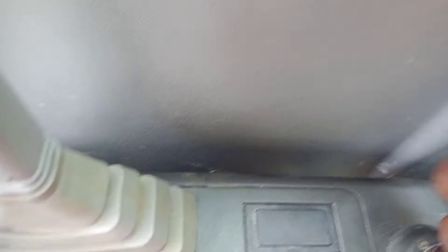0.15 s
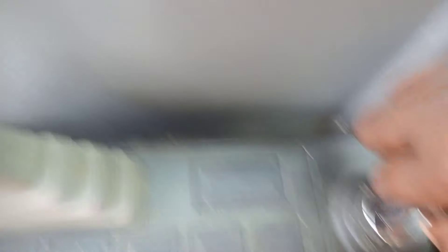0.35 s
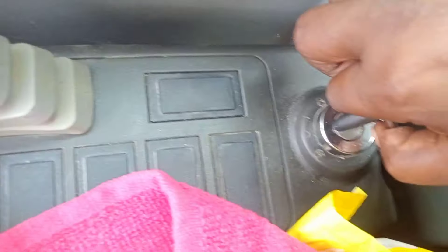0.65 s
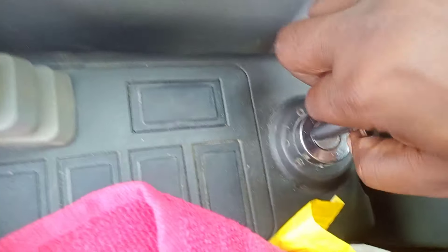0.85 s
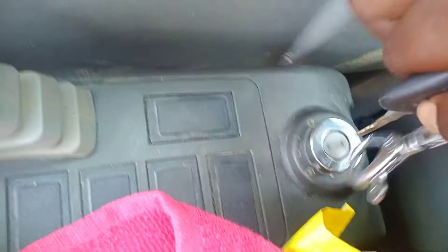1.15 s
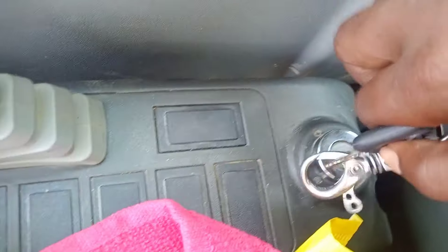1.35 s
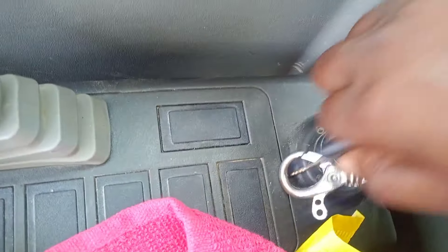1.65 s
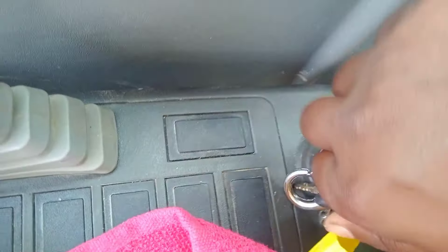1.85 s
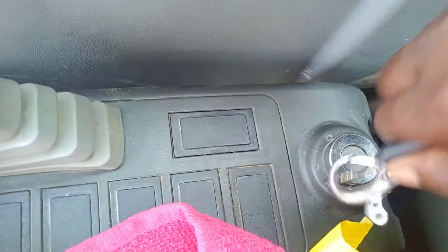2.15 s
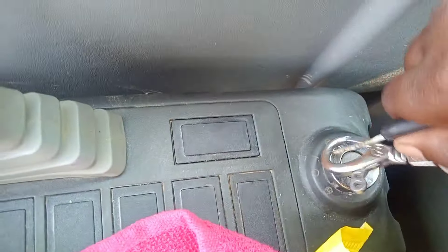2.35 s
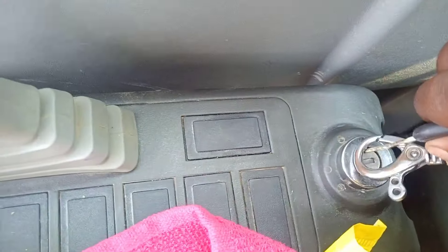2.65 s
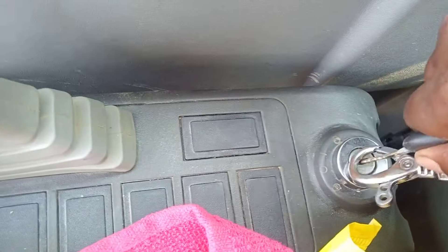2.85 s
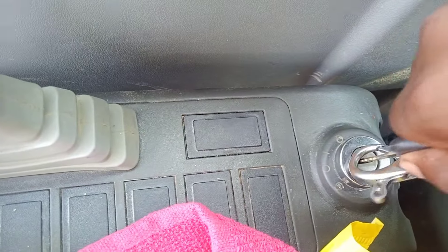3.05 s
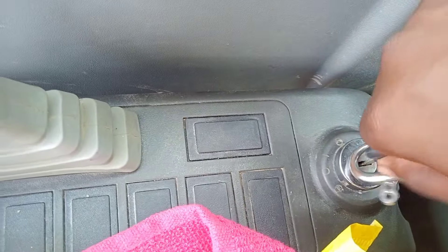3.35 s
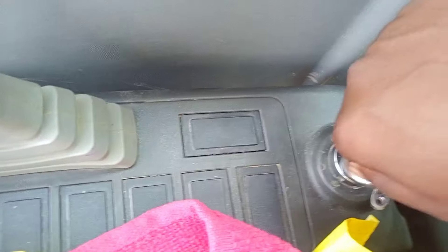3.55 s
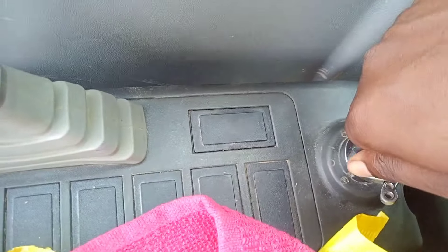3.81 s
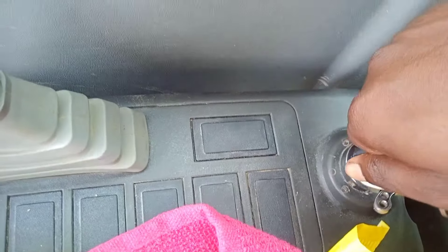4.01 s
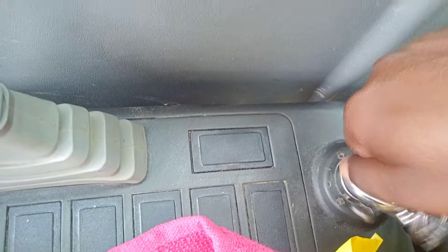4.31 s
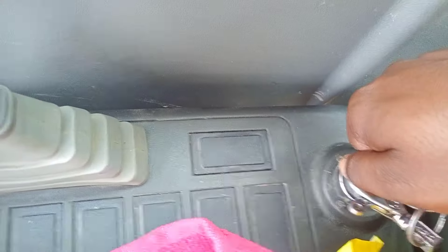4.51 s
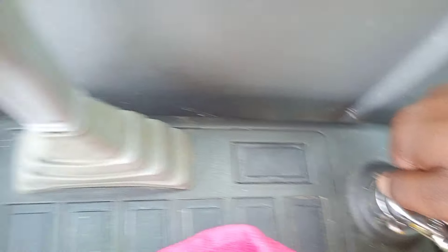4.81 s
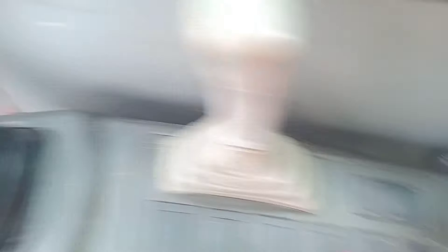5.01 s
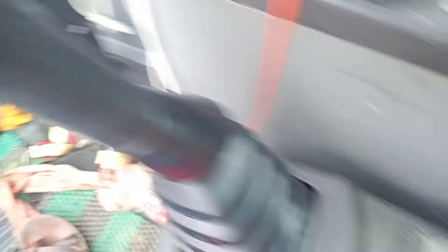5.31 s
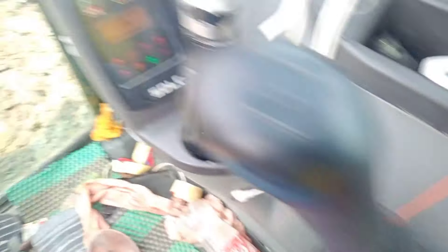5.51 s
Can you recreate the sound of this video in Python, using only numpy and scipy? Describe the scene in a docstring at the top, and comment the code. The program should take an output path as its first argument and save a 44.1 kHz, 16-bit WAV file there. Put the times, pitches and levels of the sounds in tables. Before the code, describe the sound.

Centred close-up of key handling in a small, short-echoed cab. Hard pops from fingers on the camera come first, then irregular metal clacks with hollow plastic thuds and gritty scrapes as the key finds its slot. The handling thins out and nearly stops before a crisp ignition snap with a short springy ring. After a pause a quiet, grainy motor hum starts and holds. Very faint rumble and a few thin chirps lie behind.

```python
"""A bunch of keys clatters on an ignition lock in a hollow plastic console, inside a small excavator cab.
The key scrapes in and snaps the switch over; some 0.8 s later an electric motor begins to whirr.
Fingers bump and rub the camera, mostly in the first second; faint chirps, ticks and a rumble lie behind.
Blows are damped modes and short noise bursts, slides are grainy noise driving the same modes,
bumps are falling chirps, and the motor and the rumble are coloured noise."""
import sys
import numpy as np
from scipy import signal
from scipy.fft import rfft, irfft, next_fast_len
from scipy.io import wavfile
from scipy.ndimage import uniform_filter1d, map_coordinates

SR = 44100
rng = np.random.default_rng(int(sys.argv[2]) if len(sys.argv) > 2 else 0)


def int16_out(signal):
    """Quantize to a 16-bit WAV file."""
    q = np.round(np.clip(np.atleast_2d(signal).T, -1, 1) * 32767)
    wavfile.write(sys.argv[1], SR, q.astype(np.int16))


N = 250104
T = np.arange(SR // 2) / SR  # time since a blow, s


def amp(db):
    """Level: decibels to a linear gain."""
    return 10 ** (np.asarray(db) / 20)


def unit(x):
    """Normalisation: scale to rms 1."""
    return x / np.sqrt(np.mean(x ** 2) + 1e-20)


def struck(x):
    """Normalisation of a transient: rms 1 over its first 20 ms."""
    return x / np.sqrt(np.mean(x[:SR // 50] ** 2) + 1e-20)


def along(points, hz):
    """Interpolation of (Hz, value) points on a log-frequency axis."""
    point_hz, values = np.transpose(points)
    return np.interp(np.log(hz + 1), np.log(point_hz + 1), values)


def hump(hz, centre_hz, octaves):
    """Resonance curve: a bell of height 1 on a log-frequency axis."""
    return np.exp(-(np.log2((hz + 1) / centre_hz) / octaves) ** 2)


def filtered(x, response):
    """Linear filtering: the spectrum of x times a response of frequency."""
    n = x.shape[-1]
    m = next_fast_len(n + 4096)
    return irfft(rfft(x, m) * response(np.fft.rfftfreq(m, 1 / SR)), m)[..., :n]


def noise(spectrum, size):
    """Coloured noise: white noise shaped by (Hz, dB) points, rms 1."""
    return unit(filtered(rng.standard_normal(size), lambda hz: amp(along(spectrum, hz))))


def wobble(rate):
    """Random modulation: a smooth curve through rate random knots a second."""
    knots = rng.standard_normal(int(N * rate / SR) + 4)
    return map_coordinates(knots, [np.arange(N) * rate / SR])


def fade(t60):
    """Damping: exponential decay by 60 dB in t60 seconds."""
    return np.exp(-np.log(1000) * T / max(t60, 1e-4))


def onset(rise):
    """Finite contact time: an exponential swell with time constant rise in seconds."""
    return 1 - np.exp(-T / max(rise, 1e-5))


def ring(modes, scatter_db, detune):
    """Modal superposition: damped sines; each blow lands elsewhere and excites them differently."""
    total = np.zeros(len(T))
    for hz, db, t60 in modes:
        level, shift, phase = rng.standard_normal(3)
        sine = np.sin(2 * np.pi * (hz * (1 + detune * shift) * T + phase))
        total += amp(db + scatter_db * level) * fade(t60) * sine
    return struck(total)


def add(track, s, sound):
    """Superposition: mix a sound into the track at s seconds."""
    part = track[max(round(s * SR), 0):][:len(sound)]
    part += sound[:len(part)]


def stroke(start, length, db, attack, release):
    """Force envelope: swell, hold and fade; attack and release are the times for 20 dB."""
    t = np.arange(N) / SR
    outside = np.maximum((start - t) / attack, (t - start - length) / release)
    return amp(db) * 10 ** -np.maximum(outside, 0)


# Spectrum of the faint outdoor rumble. Each row: frequency in Hz, level in dB.
RUMBLE_SPECTRUM = [(20, -37), (38, -5.5), (58, 8.5), (110, -7), (250, -8), (600, -14), (1000, -18),
                   (1600, -22.5), (2800, -21.5), (3800, -28.5), (5000, -39), (6300, -48), (9500, -43),
                   (15500, -51.5)]
RUMBLE_DB = -59


def rumble():
    """Broadband background noise whose level drifts slowly."""
    return amp(RUMBLE_DB + 0.85 * wobble(3.6)) * noise(RUMBLE_SPECTRUM, N)


# Thin, far-off calls. Each row: start in seconds, end in seconds, top pitch in Hz, level in dB.
CHIRPS = [(1.8, 1.89, 3600, -69), (3.28, 3.351, 3700, -71), (3.952, 4.08, 3540, -73.5)]


def bird(arch=.09):
    """Frequency modulation: faint whistles from outside whose pitch follows an arch."""
    out = np.zeros(N)
    for start, end, top_hz, db in CHIRPS:
        u = np.linspace(0, 1, max(round((end - start) * SR), 2))
        pitch = top_hz * (1 - arch * (2 * u - .9) ** 2)
        tone = np.sin(2 * np.pi * np.cumsum(pitch) / SR)
        add(out, start, amp(db) * np.sin(np.pi * u) * tone)
    return out * amp(2.75 * wobble(180))  # echoes on the way make them flutter


# Small loose things ticking in the cab. Each row: time in seconds, strength in dB.
TICKS = [(1.934, -31.5), (4.694, -39.5), (5.473, -42.5), (5.551, -42), (5.574, -39)]
# Spectrum of skin on a casing, which also colours the loose ticks. Each row: frequency in Hz, level in dB.
SKIN_SPECTRUM = [(40, -22.5), (100, -2.5), (250, 4.5), (600, -1), (1200, -6), (2000, -5.5), (3300, -15.5),
                 (4500, -20.5), (6200, -35.5), (9500, -31.5), (15500, -37.5)]


def ticks():
    """Impulsive excitation: light, dry ticks of loose parts as decaying noise."""
    out = np.zeros(N)
    for s, db in TICKS:
        add(out, s, amp(db - 5.5) * noise(SKIN_SPECTRUM, len(T)) * fade(0.024))
    return out


# Spectrum of the motor's rush. Each row: frequency in Hz, level in dB.
WHIRR_SPECTRUM = [(71, -49.5), (120, -7), (221, -9.5), (276, 0.5), (353, -18), (390, -5.5), (764, -1),
                  (1080, -17.5), (1300, -5), (1490, -16), (2340, -12.5), (3810, -18.5), (6210, -43),
                  (9510, -41), (15500, -47)]
MOTOR_START_S, SPIN_UP_S, MOTOR_DB = 5.276, 0.066, -51  # switch-on, time constant, rush at full speed


def motor(whine_hz=765, whine_db=-4):
    """First-order run-up: a grainy rush grows with speed, a fuzzy steady-pitched whine with its square."""
    since_start = np.maximum(np.arange(N) / SR - MOTOR_START_S, 0)
    speed = 1 - np.exp(-since_start / SPIN_UP_S)
    resonance = lambda hz: 1 / (1 + ((hz - whine_hz) / 35) ** 2)
    whine = unit(filtered(rng.standard_normal(N), resonance))
    rush = noise(WHIRR_SPECTRUM, N) * unit(amp(2.48 * wobble(160)))
    return amp(MOTOR_DB) * speed * (rush + amp(whine_db) * speed * whine)


# Fingers on the camera body. Each row: time in seconds, strength in dB, starting pitch in Hz,
# time for the pitch to halve in seconds, t60 in seconds.
BUMPS = [(.39, -10, 4340, 0.0022, 0.011), (0.3959, -15, 3920, .0011, 0.015),
         (.4304, -4.5, 3720, 0.00044, 0.021), (0.456, -29, 400, 0.003, .08),
         (0.5691, -17, 4020, .00059, 0.022), (.5769, -4.5, 3264, .00055, .021),
         (.64, -24, 1010, 0.0014, .029), (0.8719, -14, 1780, 0.00094, 0.019)]
# Skin rubbing the camera. Each row: start in seconds, length in seconds, level in dB,
# attack and release in seconds per 20 dB.
RUBS = [(.487, 0.017, -33, 0.025, 0.135), (0.791, 0.05, -36.5, 0.12, 0.052),
        (5.513, 0.013, -47, 0.023, 0.023)]
EDGE_DB, EDGE_GROWTH = 5.5, 3.1  # sharp edge re the shell of a 0 dB bump; dB gained on it per dB of strength


def handling():
    """Dispersion and stick-slip: fingers bump and rub the camera, close and without any echo."""
    pressure = sum(stroke(*rub) for rub in RUBS)
    stick_slip = unit(amp(0.9 * wobble(60) + 2.8 * wobble(700)))
    out = pressure * noise(SKIN_SPECTRUM, N) * stick_slip
    for s, db, pitch_hz, sag, t60 in BUMPS:
        # bending waves in the casing: the treble arrives first, the bass trails
        cycles = pitch_hz * sag * np.log1p(T / sag)
        shell = np.sin(2 * np.pi * cycles) * fade(t60) * onset(0.00072)
        edge = np.sin(2 * np.pi * 8600 * T) + np.sin(2 * np.pi * 3300 * T)
        edge = (edge + 0.11 * rng.standard_normal(len(T))) * fade(.003) * onset(.0001)
        scatter = 0.21 * noise(SKIN_SPECTRUM, len(T)) * fade(t60)
        add(out, s, amp(db) * (shell + scatter + amp(EDGE_DB + EDGE_GROWTH * db) * edge))
        add(out, s + 0.0015, 0.05 * amp(db) * shell)  # the wave returns from the casing's edge
    return out


# Firm grips on the key, which lower the console's thud. Each row: start in seconds, end in seconds,
# thud pitch in Hz.
GRIPS = [(1.09, 1.24, 187), (3.2, 3.66, 159), (4.42, 4.45, 205)]
LOOSE_THUD_HZ = 294


def gripped(s):
    """Boundary condition: 1 while the key is gripped firmly, else 0."""
    return sum((s >= start) & (s < end) for start, end, _ in GRIPS)


def thud_pitch(s):
    """Boundary condition: the pitch that the console favours at time s."""
    return next((hz for start, end, hz in GRIPS if start <= s < end), LOOSE_THUD_HZ)


# Modes of the hollow console. Each row: frequency in Hz, level in dB, t60 in seconds.
CONSOLE = [(76.9, -20.5, 0.37), (147.3, -4.5, 0.23), (190, -4.5, 0.16), (251, -5, 0.13), (284.9, 0, .14),
           (334.8, -4.5, 0.12), (422.7, -4, 0.1), (500, -4, 0.12), (575, -3, 0.038)]


def thud(pitch_hz, lift_db, octaves):
    """Selective modal excitation: the direction of the push favours console modes near one pitch."""
    modes = [(hz, db + lift_db * hump(hz, pitch_hz, octaves), t60) for hz, db, t60 in CONSOLE]
    return ring(modes, scatter_db=2.5, detune=.03) * onset(0.0038)


# Metal sliding on metal. Each row: start in seconds, length in seconds, force in dB,
# console shudder in dB relative to the force.
SLIDES = [(0.053, .025, -35.5, -6.5), (.315, .05, -50, 4.5), (1.037, .13, -40.5, 3.5),
          (1.413, 0.047, -39.5, 5.5), (1.501, 0.13, -54, 0), (1.679, .11, -39, 0),
          (2.003, .135, -28.5, -5.5), (2.185, .045, -41.5, -6), (2.276, 0.096, -48, 8.5),
          (2.435, 0.21, -58, 4), (2.875, .035, -39, 6), (3.102, 0.18, -54, 11.5), (3.483, .15, -37, 4),
          (3.681, .13, -65.5, 5)]
CATCHES_PER_S, CATCH_DB = 20, 6  # teeth that snag during a slide; their mean strength re its force


def catches(pitch_hz=2200, spread=.3, scatter_db=3, thud_db=-8, tick_db=-19):
    """Random impacts: light contacts within each slide, as rows like those of CONTACTS."""
    rows = []
    for start, length, db, _ in SLIDES:
        for when, force, place in rng.uniform(-1, 1, (8, 3))[:round(CATCHES_PER_S * length)]:
            s = start + length * (when + 1) / 2
            strength_db = db + CATCH_DB + scatter_db * force
            rows.append((s, strength_db, pitch_hz * np.exp(spread * place), thud_db, tick_db))
    return rows


def rubbed(modes):
    """Convolution: continuous friction noise drives a set of modes, rms 1."""
    response = ring(modes, scatter_db=0.5, detune=0.013) * onset(0.00086)
    return unit(signal.fftconvolve(rng.standard_normal(N), response)[:N])


# Spectrum of the scrape. Each row: frequency in Hz, level in dB.
SCRAPE_SPECTRUM = [(100, -29), (300, -4), (550, -7), (820, 8.5), (1100, -5), (1900, 1.5), (2500, -3.5),
                   (3200, -8), (4000, -15.5), (5500, -31.5), (9000, -49)]
# Spectrum of the bright metal tick. Each row: frequency in Hz, level in dB.
TICK_SPECTRUM = [(2500, -32), (4500, 3.5), (6500, -5), (9000, 1.5), (12500, -6), (15000, -2.5)]
# Modes of the lock barrel. Each row: frequency in Hz, level in dB, t60 in seconds.
BARREL = [(1691, 2, 0.04), (1875, -13, 0.13), (2296, -9, 0.059), (3116, -12, .06)]
SLIDE_ATTACK_S, SLIDE_RELEASE_S, SHUDDER_RELEASE_S = 0.017, 0.045, 0.1  # time to change by 20 dB


def slides(barrel_db=-10, tick_db=-23, grain_db=2.5):
    """Stick-slip: the key's teeth catch and slip, a grainy scrape that rings barrel and console."""
    force, shudder = np.zeros(N), np.zeros(N)
    for s, length, db, shudder_db in SLIDES:
        force += stroke(s, length, db, SLIDE_ATTACK_S, SLIDE_RELEASE_S)
        shudder += stroke(s, length, db + shudder_db, SLIDE_ATTACK_S, SHUDDER_RELEASE_S)
    grip = force * unit(amp(grain_db * wobble(450)))
    steel = noise(SCRAPE_SPECTRUM, N) + amp(tick_db) * noise(TICK_SPECTRUM, N)
    # a firm grip strengthens the console's second and third modes
    firm = uniform_filter1d(1.0 * gripped(np.arange(N) / SR), size=900)
    console = amp(-2.5) * rubbed(CONSOLE[3:]) + (0.39 + .45 * firm) * rubbed(CONSOLE[1:3])
    return amp(-3.0) * grip * steel + amp(barrel_db) * force * rubbed(BARREL) + shudder * console


# Spectrum of the key's clack. Each row: frequency in Hz, level in dB.
CLACK_SPECTRUM = [(100, -29.5), (300, -5.5), (500, -10), (800, 3), (1150, -4.5), (1800, 0.5), (2500, -1),
                  (3200, 0), (4000, -10.5), (5500, -31.5), (9000, -40)]


def clack(pitch_hz, lift_db, octaves, t60):
    """High modal density: the short ring of a key as noise in which one region stands out."""
    colour = lambda hz: amp(along(CLACK_SPECTRUM, hz) + lift_db * hump(hz, pitch_hz, octaves))
    dense = filtered(rng.standard_normal(len(T)), colour)
    return struck(dense * (fade(t60) + 0.093 * fade(0.011)) * onset(0.0004))


def chatter(rate, depth_db):
    """Repeated impact: tiny rebounds make the strength of a contact flutter while it dies."""
    knots = np.arange(0, 1, 1 / rate)
    flutter = np.clip(rng.standard_normal(len(knots)), -2, 2)
    return amp(depth_db * np.interp(T, knots, flutter))


# Key against lock, from faint touches to hard blows. Each row: time in seconds, strength in dB,
# clack pitch in Hz, console thud and bright tick in dB relative to the strength
# (each layer then has its own fixed trim).
CONTACTS = [(.0014, -20.5, 2040, -17, -36.5), (0.0574, -12.5, 2090, -22.5, -39.5),
            (0.7998, -22.5, 1758, -29, -37.5), (1.034, -32, 1140, 5, -39.5), (1.0833, -20, 1910, 0, -31.5),
            (1.0952, -13.5, 2440, -6.5, -24), (1.1153, -16, 2000, -6.5, -19.5),
            (1.1407, -9, 1782, -13, -28.5), (1.1698, -23, 3100, -6.5, -39),
            (1.333, -9.5, 3150, -11.5, -22.5), (1.3511, -19, 3170, -5, -24.5),
            (1.4062, -4.5, 1840, -16.5, -28.5), (1.4115, -11, 1692, -16, -29.5),
            (1.4578, -12, 3380, -17, -25.5), (1.7394, -4, 1623, -12.5, -44),
            (1.7687, -19.5, 1450, -2.5, -27), (1.7836, -26.5, 1270, -11, -22),
            (1.8895, -33.5, 1134, -12.5, -38.5), (2.001, -14.5, 2290, -17, -30.5),
            (2.066, -16.5, 1736, -7.5, -25), (2.0889, -17.5, 1739, -11.5, -27.5),
            (2.1839, -32, 1789, -6, -27.5), (2.258, -18, 2390, -8.5, -25), (2.3317, -15, 3230, -13, -14.5),
            (2.403, -35, 3400, -13, -13), (2.4329, -27, 2600, -13, -22.5),
            (2.5567, -35.5, 3150, -15, -14.5), (2.588, -40.5, 2250, 1, -18), (2.7228, -47, 2190, -7, -18.5),
            (2.8827, -16, 2010, -17, -17.5), (2.893, -18.5, 1930, -5.5, -24), (2.9396, -36, 2680, -1, -22),
            (3.1196, -36.5, 1850, -0.5, -15), (3.2341, -29, 2040, -1.5, -12.5),
            (3.366, -57.5, 1196, 2, -26), (3.471, -22.5, 2810, -9.5, -22), (3.5154, -20, 1520, -5.5, -29.5),
            (3.5364, -15, 1246, -8.5, -33), (3.6006, -21.5, 1881, -2.5, -22.5),
            (3.6135, -17, 2960, -7.5, -22), (3.715, -41.5, 1870, -0.5, -36), (3.8056, -48, 1195, 1, -39.5),
            (4.1079, -56.5, 1530, 3, -33), (4.1865, -41.5, 1940, -9, -32.5),
            (4.2986, -45, 1940, -8.5, -40.5), (4.4379, -13.5, 2840, -7, -26.5),
            (4.4606, -6.5, 1950, -15.5, -22.5), (4.4679, -19, 1290, -3, -18.5)]
# Modes of the key ring. Each row: frequency in Hz, level in dB, t60 in seconds.
KEYRING = [(4440, -1, 0.03945), (6130, -1.5, 0.072), (8700, -8.5, 0.056), (9640, 1.5, 0.065),
           (10850, -4.5, 0.019), (13500, -4, 0.034), (14900, -3, 0.016)]


def contacts():
    """Impact excitation: each touch ticks, rings the key and its ring, and thuds in the console."""
    out = np.zeros(N)
    for s, db, pitch_hz, thud_db, tick_db in CONTACTS + catches():
        rebounds = chatter(rate=700, depth_db=3.0)
        key = struck(rebounds * clack(pitch_hz, lift_db=9.5, octaves=0.16, t60=0.06))
        body = thud(thud_pitch(s), lift_db=10.5, octaves=0.75)
        tick_decay = (fade(.01) + 0.38 * fade(0.046)) * onset(0.001)
        tick = struck(rebounds * noise(TICK_SPECTRUM, len(T)) * tick_decay)
        jingle = ring(KEYRING, scatter_db=4.0, detune=0.014)
        add(out, s, amp(db - 15.5) * key + amp(db + thud_db - 0.5) * body)
        add(out, s, amp(db + tick_db - 8.0) * tick + amp(db + tick_db - 17) * jingle)
    return out


# Modes of the panel. Each row: frequency in Hz, level in dB, t60 in seconds.
PANEL = [(442, -4, 0.047), (502, -2.5, 0.084), (683, 0.5, 0.07), (777, -1.5, 0.14), (866, 1.5, 0.054),
         (1040, -5, 0.04), (1247, -5, 0.084)]
# Modes of the switch's detent. Each row: frequency in Hz, level in dB, t60 in seconds.
SPRING = [(220, 1.5, .4), (337.5, 10.5, .22), (410, 2, .18), (1157, -17, .55), (1852, -12, .46),
          (1900, -10, .46)]
BARREL_DB, BARREL_LIFT_DB = -30, 28  # barrel ring re the contact; its rise when the clack is in tune with it
PANEL_DB, PANEL_LIFT_DB, BLUNT_HZ = -14, 11.5, 1350  # ring re the thud; rise for blunt blows near this pitch
PUSH_S, PUSH_RISE_S, PUSH_DB = 3.575, 0.045, -25  # a hard push on the key; level before swell and decay
SNAP_S, SNAP_DB = 4.462, -33  # the switch snaps over


def lock():
    """Resonance: tuned contacts ring the barrel, blunt ones the panel; a push and a snap ring on."""
    out = np.zeros(N)
    for s, db, pitch_hz, thud_db, _ in CONTACTS:
        barrel_db = db + BARREL_DB + BARREL_LIFT_DB * hump(pitch_hz, BARREL[0][0], octaves=0.088)
        panel_db = db + thud_db + PANEL_DB + PANEL_LIFT_DB * hump(pitch_hz, BLUNT_HZ, octaves=0.33)
        add(out, s, amp(barrel_db) * ring(BARREL, scatter_db=1.5, detune=0.002045) * onset(0.00045))
        add(out, s, amp(panel_db) * ring(PANEL, scatter_db=0.0, detune=0.038) * onset(0.0008))
    # the push sways the console's deepest mode
    deep_hz, _, deep_t60 = CONSOLE[0]
    sway = np.sin(2 * np.pi * deep_hz * T) * fade(deep_t60) * onset(PUSH_RISE_S)
    add(out, PUSH_S, amp(PUSH_DB) * sway)
    add(out, SNAP_S, amp(SNAP_DB) * ring(SPRING, scatter_db=4.5, detune=.001) * onset(0.0025))
    return out


# Reverberation of the cab. Each row: frequency in Hz, t60 in seconds.
CAB = [(150, 0.11), (500, 0.17), (2000, 0.06), (5000, 0.042), (12000, 0.076)]


def cab(x):
    """Reverberation: a decaying noise tail of unit energy, 5 ms late, longest around 500 Hz."""
    hz, t, z = signal.stft(rng.standard_normal(SR // 2), SR, nperseg=256)
    decay = amp(-60 * t / along(CAB, hz)[:, None])
    tail = signal.istft(z * decay, SR, nperseg=256)[1]
    return signal.fftconvolve(x, np.pad(tail / np.linalg.norm(tail), (SR // 200, 0)))[:N]


def scene():
    """Superposition of all sources in the middle; only the keys and lock excite the cab's echo."""
    keys = contacts() + lock() + slides()
    background = rumble() + bird() + ticks() + motor()
    mono = background + handling() + keys + amp(-12.0) * cab(keys)
    return np.array([mono, mono])


def record(dry, low_cut_hz=38, top_hz=15750):
    """Band limiting: a third-order low cut sheds the deepest bass; nothing passes from top_hz up."""
    return filtered(dry, lambda hz: (hz < top_hz) / np.sqrt(1 + (low_cut_hz / (hz + 1)) ** 6))


dry = scene()
out = record(dry)
int16_out(out)
```